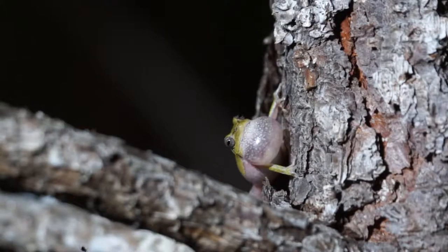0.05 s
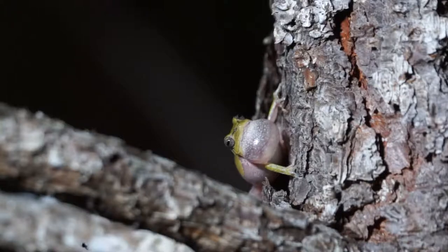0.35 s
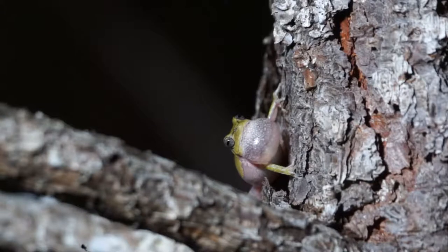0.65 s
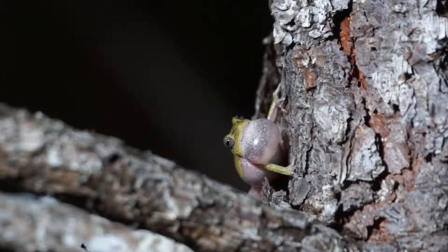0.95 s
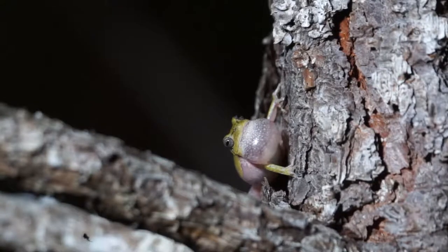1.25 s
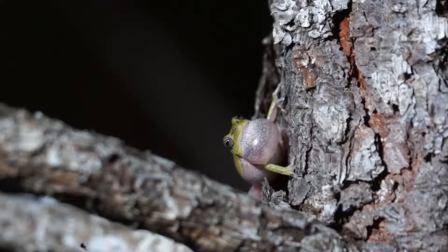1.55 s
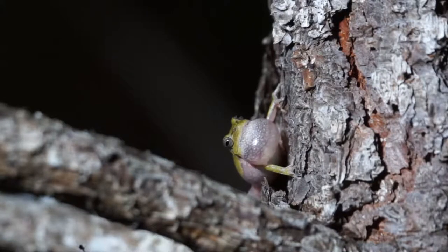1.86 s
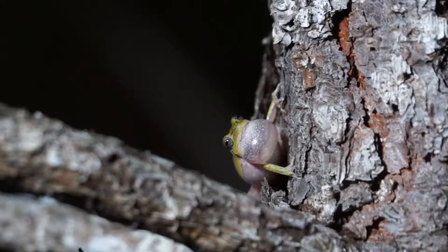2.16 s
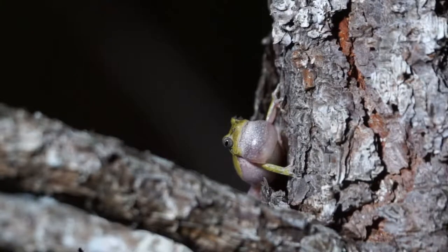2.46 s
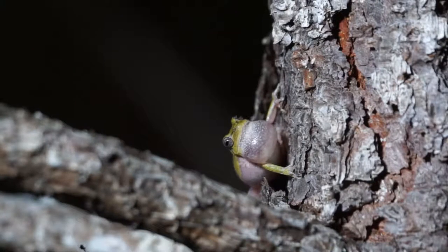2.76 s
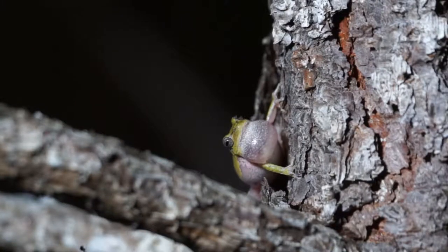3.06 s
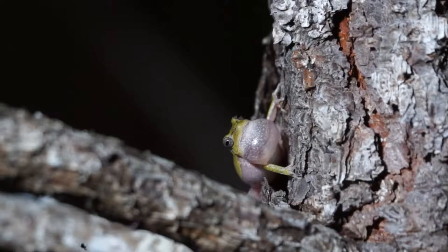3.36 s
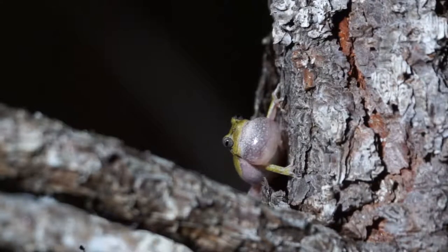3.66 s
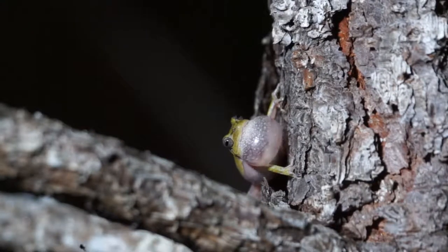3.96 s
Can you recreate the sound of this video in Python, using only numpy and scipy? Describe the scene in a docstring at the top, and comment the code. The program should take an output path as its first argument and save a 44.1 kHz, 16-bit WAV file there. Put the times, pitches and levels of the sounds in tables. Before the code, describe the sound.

Close by in the woods at night, a tree frog keeps up a fast run of harsh, high-pitched croaks with a faint echo. A distant frog chorus swells and sinks underneath, along with brief high calls and faint hiss.

```python
"""A tree frog at night

A nearby frog on a trunk croaks about ten times a second. Each croak is three or four pulses:
the vocal cords snap open, then the throat sac sings a brief falling tone with overtones.
Trees scatter a faint echo. Behind it a pond full of frogs rattles on, with higher far calls
and a thin hiss."""
import sys
import numpy as np
from scipy import signal
from scipy.fft import rfft, irfft, next_fast_len
from scipy.io import wavfile

SR = 44100
rng = np.random.default_rng(int(sys.argv[2]) if len(sys.argv) > 2 else 0)


def unload_audio(sound):
    """Save the sound as a 16-bit wav file, at the path given as the first command line argument."""
    columns = np.transpose(np.atleast_2d(sound))
    # keep every value between -1 and 1, then stretch to whole-number steps
    steps = np.round(np.clip(columns, -1, 1) * 32767)
    wavfile.write(sys.argv[1], SR, steps.astype(np.int16))


N = 176400
T = np.arange(N) / SR

# The croaks. Each row: start in seconds, level in dB, extra dB for the middle pulses,
# time between pulses in milliseconds, number of pulses.
CROAKS = [(0.101, -10.5, -1.5, 11, 3), (0.2248, -11, -1, 11.2, 3), (0.3314, -10, -0.9, 10.56, 3),
          (0.4273, -10.5, -0.3, 10.7, 3), (0.5268, -10, -1, 10.6, 3), (0.6797, -11.5, 1.8, 11.26, 3),
          (0.8469, -9.5, -1.8, 11.35, 4), (0.979, -10.5, -2, 11.2, 3), (1.0844, -9.5, -1.6, 10.74, 3),
          (1.1773, -8.5, -3.5, 10.8, 3), (1.2762, -9, -1.8, 10.7, 3), (1.4088, -10.5, 1.2, 10.84, 3),
          (1.5306, -10, -0.5, 10.36, 3), (1.628, -9, -3.5, 10.2, 3), (1.723, -8.5, -3, 10.94, 3),
          (1.8214, -10, 0, 10.65, 3), (1.9225, -11.5, 2.5, 10.7, 4), (2.0327, -8.5, -2, 10.26, 3),
          (2.1382, -9, -0.9, 10.58, 3), (2.235, -10.1, 1.0, 10.9, 3), (2.3343, -9.1, -0.2, 10.65, 3),
          (2.448, -12, 5, 10.6, 3), (2.5492, -12, 3.5, 10.8, 3), (2.6448, -9.1, -0.5, 11.2, 4),
          (2.7622, -10, 0.8, 10.63, 3), (2.8645, -9.5, 0.9, 10.25, 3), (2.966, -10, -2, 10.7, 3),
          (3.0675, -10.5, 0.5, 10.4, 3), (3.169, -10.5, 1.9, 10.5, 3), (3.2732, -9, 1.5, 10.9, 3),
          (3.3794, -10, 1, 10.5, 3), (3.475, -8, -0.7, 11.7, 3), (3.577, -10, -0.9, 10.95, 4),
          (3.6882, -11, 2.5, 10, 3), (3.7919, -9, 1, 10.71, 3), (3.9015, -11.5, 4, 10.6, 3)]
# Lead-in pulses just ahead of the later croaks. Each row: start in seconds, level in dB, pitch in Hz.
LEAD_INS = [(1.9146, -11.5, 2190), (2.0234, -10.5, 2070), (2.129, -11.5, 2070), (2.2254, -10.5, 2123),
            (2.3255, -13, 1950), (2.4382, -11, 2150), (2.54, -10.5, 2068), (2.6367, -13, 2070),
            (2.7527, -12.3, 2030), (2.8545, -11.5, 2045), (2.9547, -5.5, 2202), (3.0575, -11, 2034),
            (3.1592, -10.5, 2156), (3.2633, -15.5, 2050), (3.37, -10, 2144), (3.4665, -10.5, 2157),
            (3.568, -11, 2104), (3.6781, -9, 2100), (3.7823, -12.5, 2064), (3.8918, -10.5, 2017),
            (3.9944, -10.5, 2198)]
# Lead-ins too slack to sound the sac, so the octave wins. Each row: start in seconds, level in dB.
SQUEAKS = [(0.971, -18.5), (1.4012, -20), (1.522, -16.5), (1.6186, -17), (1.7157, -22), (1.8138, -15.5),
           (1.9143, -17)]
# The tone of each kind of pulse. Each list: levels in dB of harmonics 1 to 7.
CROAK_VOICE = [-1.5, -15.5, -21, -29, -53, -52.5, -52.5]
LEAD_VOICE = [-4.5, -16.5, -32, -26.5, -47, -43, -59]
SQUEAK_VOICE = [-12, -2, -21.5, -18, -21.5, -46.5, -38]
def tree_frog():
    """The frog croaks in quick pulses, the last shorter and higher, often after a lead-in or squeak."""
    out, rasp = np.zeros(N), cord_rasp()
    for start, db, extra_db, gap_ms, count in CROAKS:
        add(out, start, undb(db) * pulse(2129.7, CROAK_VOICE, rasp))
        for k in range(1, count - 1):
            add(out, start + k * gap_ms / 1000, undb(db + extra_db) * pulse(2144, CROAK_VOICE, rasp))
        last_start = start + ((count - 1) * gap_ms + .11) / 1000
        last_db = db + extra_db / 2 - .83 - 4 * (count > 3)  # a fourth pulse is softer still
        last = pulse(2207, CROAK_VOICE, rasp, rise_ms=1.7, ring_ms=.8, fall_hz_per_ms=40, buzz_ms=2.8)
        add(out, last_start, undb(last_db) * last)
    for start, db, hz in LEAD_INS:
        lead_in = pulse(hz, LEAD_VOICE, rasp, rise_ms=1.9, fall_hz_per_ms=80, buzz_ms=3.1)
        add(out, start, undb(db) * lead_in)
    for start, db in SQUEAKS:
        squeak = pulse(1772, SQUEAK_VOICE, rasp, rise_ms=1.3, ring_ms=.9, fall_hz_per_ms=40, buzz_ms=2.8)
        add(out, start, undb(db) * squeak)
    return out


# The snap of the opening cords. Each row: pitch in Hz, fade time in milliseconds, level in dB.
SNAP_RINGS = [(2610, 0.48, -11.5), (3830, 0.41, -4), (7970, 0.25, -19.5), (8500, 0.14, -21)]
def pulse(hz, voice, rasp, rise_ms=2.2, ring_ms=1.3, fall_hz_per_ms=75, buzz_ms=3.8):
    """A snap, then a falling tone. Overtones and rasp last while the cords buzz; the sac rings on."""
    t = T[:512]
    ms = 1000 * t
    chance = rng.standard_normal(12)  # no two pulses are quite alike
    pitch = hz * (1 + .013 * chance[0]) + fall_hz_per_ms * (rise_ms - np.minimum(ms, buzz_ms))
    phase = 2 * np.pi * np.cumsum(pitch) / SR
    sac_swell = np.sin(np.pi / 2 * np.minimum(ms / rise_ms, 1)) ** 1.05
    sac_fade = 1 / np.cosh(1.15 * np.maximum(ms - rise_ms, 0) / ring_ms)
    cords = np.maximum(np.sin(np.pi * np.minimum(ms / buzz_ms, 1)), 0)
    out = undb(voice[0]) * sac_swell * sac_fade * np.sin(phase)
    for k in range(1, len(voice)):
        out += undb(voice[k] + 1.5 * chance[k]) * cords ** 1.25 * np.sin((k + 1) * phase)
    for (ring_hz, fade_ms, db), detune in zip(SNAP_RINGS, chance[::-1]):
        snap_shape = ms / fade_ms * np.exp(1 - ms / fade_ms) / 2
        out += undb(db) * snap_shape * np.sin(2 * np.pi * ring_hz * (1 + .044 * detune) * t)
    offset = rng.integers(N - len(t))
    out += undb(-21) * cords * rasp[offset:offset + len(t)]
    return out * undb(.5 * rng.standard_normal())


# The tone of the rasp. Each row: frequency in Hz, level in dB.
RASP_COLOUR = [(300, -34.5), (1100, -45.5), (1700, 0.5), (3600, 1.5), (5300, -8), (7000, -8.5),
               (8500, -16.5), (10500, -20), (15500, -36.5)]
def cord_rasp():
    """The rough noise of vibrating vocal cords."""
    return noise(RASP_COLOUR)


# The resonances of throat and sac. Each row: frequency in Hz, boost or cut in dB.
THROAT_COLOUR = [(700, -15.5), (1100, -13.5), (1400, -10), (1650, -2.5), (2100, 2), (2550, 6.5), (3000, 0),
                 (3700, 0), (4150, 1.5), (4450, 6.5), (4900, -1), (5350, -4), (5800, 8), (6150, 7),
                 (6550, -12), (7000, -3), (7700, 7.5), (8500, 1), (9400, -6), (11000, -11.5), (12400, -7.5),
                 (15000, -5.5)]
def throat(croaks):
    """The throat and sac strengthen some frequencies and weaken others."""
    return colour(croaks, THROAT_COLOUR)


# The tone of the echoes. Each row: frequency in Hz, boost or cut in dB.
ECHO_COLOUR = [(1000, 8), (2200, 8), (3000, 15), (4300, 14), (6000, -18), (9000, 12.5), (15000, -14)]
def tree_echoes(frog):
    """The trees scatter a faint tail, and the bark a much shorter one."""
    trees = undb(-28) * scatter(frog, fade_s=.22)
    bark = undb(-22) * scatter(frog, fade_s=.03)
    return colour(trees + bark, ECHO_COLOUR)


# How loud the pond is. Each row: time in seconds, main band in dB, band an octave up in dB.
POND_LEVELS = [(0, -32, -42.5), (.12, -41, -46), (.4, -41, -52.5), (.75, -40.5, -59), (.9, -41, -51),
               (1.3, -40, -50.5), (1.48, -36.5, -48.5), (1.68, -41, -54), (1.85, -34, -43),
               (2.099, -40, -51), (2.501, -41, -56), (3.0, -40, -50.5), (3.2, -41.5, -50),
               (3.45, -43.5, -51.5), (3.65, -39, -49), (4, -41.5, -56)]
# The tone of those two bands. Each row: frequency in Hz, level in dB.
POND_MAIN_COLOUR = [(1200, -48.5), (1600, -28), (1850, -5), (2050, -3), (2270, 10), (2480, -5),
                    (2700, -10.5), (3100, -25.5), (3800, -45)]
POND_OCTAVE_COLOUR = [(2800, -27), (3400, 7), (4000, 3), (4500, 12), (4800, 9), (5100, -17), (5500, -10),
                      (6500, -43), (8500, -29), (10000, -47)]
def pond_frogs():
    """A pond full of frogs swells and sinks in two bands of pitch."""
    times, main_db, octave_db = np.array(POND_LEVELS).T
    main = undb(np.interp(T, times, main_db)) * chorus(POND_MAIN_COLOUR)
    octave = undb(np.interp(T, times, octave_db)) * chorus(POND_OCTAVE_COLOUR)
    return main + octave


# When a nearer group calls. Each row: start in seconds, end in seconds, level in dB.
GROUP_BOUTS = [(0.036, .33, -40.5), (1.919, 2.722, -38.5), (2.72, 3.067, -43.5)]
# The tone of that group. Each row: frequency in Hz, level in dB.
GROUP_COLOUR = [(1500, -45), (2000, -11), (2280, 5.5), (2520, -1.5), (2720, -11), (3100, -25), (3900, -18),
                (4400, -8.5), (4850, -12.5), (5150, -27), (5600, -39.5), (6800, -42.5), (9000, -50)]
def nearer_frogs(fade_s=.094):
    """A nearer, higher-voiced group joins in for short spells, fading in and out."""
    level = np.zeros(N)
    for start, end, db in GROUP_BOUTS:
        level += undb(db) * np.clip(np.minimum(T - start, end - T) / fade_s + .5, 0, 1)
    return level * chorus(GROUP_COLOUR)


def chorus(tone, croaks_per_s=60, spread_db=10, wash=.65):
    """Many distant croaks of four clicks each, partly blurred into noise by the woods."""
    clicks = np.zeros(N)
    for when, pace, loudness in rng.random((int(croaks_per_s * N / SR), 3)):
        gap_s = .0105 * (.9 + .2 * pace)
        for k in range(4):
            add(clicks, when * N / SR + k * gap_s, undb([spread_db * loudness]))
    return unit(unit(colour(clicks, tone)) + wash * noise(tone))


# High calls from far off. Each row: middle of the call in seconds, level in dB.
FAR_CALLS = [(.01, -43.5), (.19, -53.5), (0.479, -42.5), (.81, -43.5), (1.03, -45), (1.26, -43.5),
             (1.48, -46.5), (2.08, -46), (2.909, -47.5), (3.25, -59), (3.43, -47.5), (3.72, -59),
             (3.96, -39)]
# The tone of those calls. Each row: frequency in Hz, level in dB.
FAR_COLOUR = [(2800, -36.5), (3300, -15.5), (3650, -4.5), (3900, 7), (4100, -12.5), (4400, -6.5),
              (5200, -42.5)]
def far_calls(width_s=.021, steady_db=-56):
    """Each far call is a brief swell in a faint, steady band of high noise."""
    swells = sum(undb(db) * np.exp(-.5 * ((T - middle) / width_s) ** 2) for middle, db in FAR_CALLS)
    return np.hypot(swells, undb(steady_db)) * noise(FAR_COLOUR)


# The tone of the hiss, in the centre and at the sides. Each row: frequency in Hz, level in dB.
AIR_CENTRE_COLOUR = [(25, -5), (100, -12), (250, -4.5), (500, -2), (1100, -5), (3000, 5.5), (6000, 0.5),
                     (10000, -13), (15500, -15.5)]
AIR_SIDE_COLOUR = [(25, -23), (100, -23), (250, -10.5), (550, -3.5), (1200, -6), (3000, 1), (4500, 3.5),
                   (7000, -18), (15500, -19)]
def night_air():
    """Night air and microphone hiss: one thin noise for the centre, another for the sides."""
    return undb(-60.5) * noise(AIR_CENTRE_COLOUR), undb(-54) * noise(AIR_SIDE_COLOUR)


def undb(db):
    """Turn decibels into a number to multiply by."""
    return 10 ** (np.asarray(db) / 20)


def unit(x):
    """Scale a sound to an average (rms) level of one."""
    return x / np.sqrt(np.mean(x ** 2))


def colour(x, tone):
    """Filter a sound along a curve of (Hz, dB) points."""
    hz, db = np.array(tone).T
    size = next_fast_len(len(x) + 512, True)
    freqs = np.maximum(np.fft.rfftfreq(size, 1 / SR), 1)
    gain = undb(np.interp(np.log(freqs), np.log(hz), db))
    return irfft(rfft(x, size) * gain, size)[:len(x)]


def noise(tone):
    """Noise with the given tone and an average level of one."""
    return unit(colour(rng.standard_normal(N), tone))


def add(out, start_s, sound):
    """Mix a sound in at a given time."""
    i = max(int(round(start_s * SR)), 0)
    part = sound[:max(len(out) - i, 0)]
    out[i:i + len(part)] += part


def scatter(x, fade_s):
    """A blurred echo, about as strong as the sound itself, that dies away by 60 dB in fade_s."""
    t = T[:SR // 2]
    tail = rng.standard_normal(len(t)) * undb(-60 * t / fade_s)
    return signal.fftconvolve(x, tail / np.linalg.norm(tail))[:N]


def scene():
    """Frog, echoes and pond sit almost in the centre; only the faint air is wide."""
    frog = throat(tree_frog())
    frogs = frog + tree_echoes(frog) + pond_frogs() + nearer_frogs() + far_calls()
    air_centre, air_side = night_air()
    centre = frogs + air_centre
    side = air_side + undb(-26.5) * scatter(frogs, fade_s=.025)  # what differs between the ears
    return np.array([centre + side, centre - side])


def record(dry, top_hz=15800):
    """A steep filter cuts the highest treble."""
    return signal.sosfilt(signal.ellip(10, .1, 80, top_hz, fs=SR, output="sos"), dry)


dry = scene()
out = record(dry)
unload_audio(out)
```